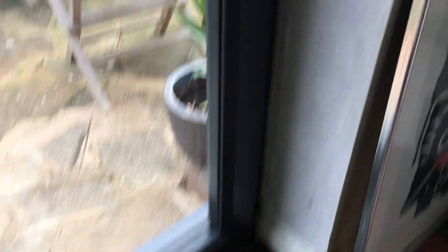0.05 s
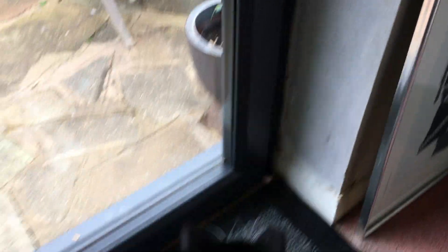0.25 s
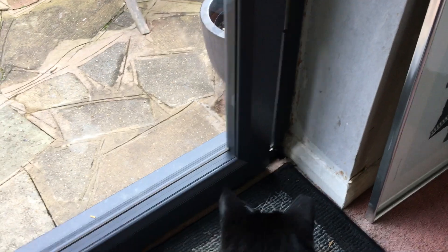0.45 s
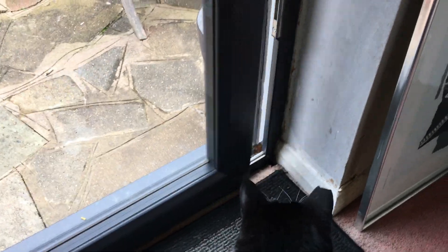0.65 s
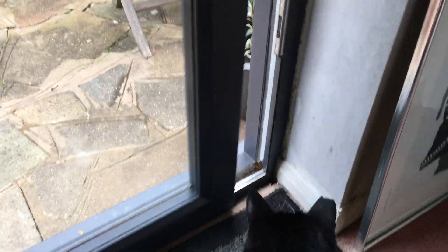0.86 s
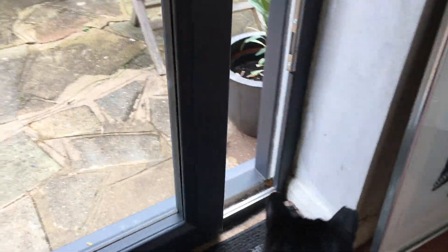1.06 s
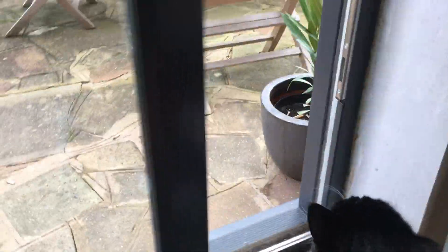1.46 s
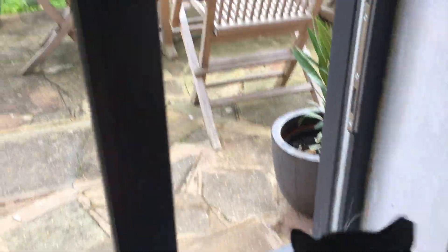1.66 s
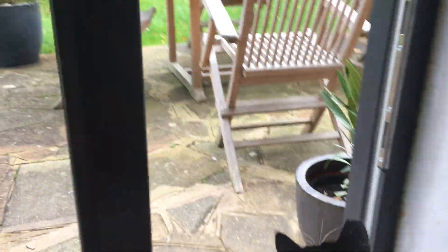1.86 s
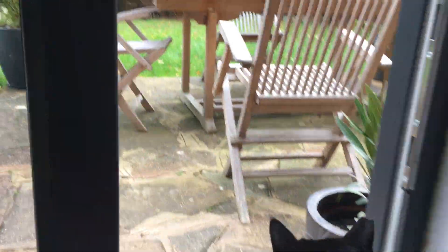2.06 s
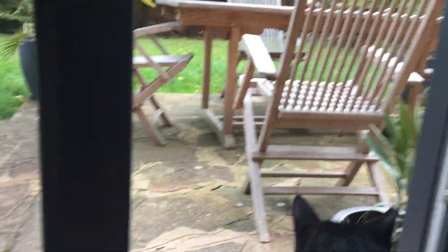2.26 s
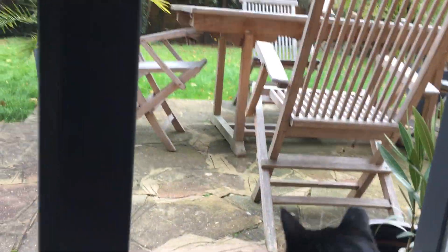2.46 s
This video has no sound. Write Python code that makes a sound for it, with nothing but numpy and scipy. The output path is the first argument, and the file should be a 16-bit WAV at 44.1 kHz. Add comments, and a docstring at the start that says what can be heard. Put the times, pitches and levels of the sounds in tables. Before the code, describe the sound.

Heavy glass door unlatching and rolling open with a low rumble, thumps and clicks.

```python
"""Indoors, close to a heavy glazed patio door as it is slid open. Handle and latch click, and the leaf
comes off its seal with a thump that swings the pane. Rollers rumble over grit in the track, with a few
knocks, while the glass drums and the brush seal hisses. As the door slows to a stop there is one thin
falling chirp, perhaps a small bird in the garden."""
import sys
import numpy as np
from scipy import signal
from scipy.fft import rfft, irfft, next_fast_len
from scipy.io import wavfile
from scipy.ndimage import map_coordinates

SR = 44100
rng = np.random.default_rng(int(sys.argv[2]) if len(sys.argv) > 2 else 0)


def digitize_waveform(pressure):
    """Quantize a signal to 16-bit integers and store it at the path in sys.argv[1].

    Rows of a 2-D input are taken as channels; values are limited to [-1, 1].
    """
    field = np.atleast_2d(pressure).T
    bounded = np.clip(field, -1, 1)
    quanta = np.round(bounded * 32767).astype(np.int16)
    wavfile.write(sys.argv[1], SR, quanta)


N = 114660

# rumble envelope, before its trim (time [s], level [dB])
RUMBLE_LEVEL = [(.1, -71.5), (.3, -64), (.5, -66), (.62, -60), (.8, -54.5), (.88, -47.5), (.97, -47),
                (1.08, -43), (1.25, -45), (1.45, -44.5), (1.65, -43), (1.85, -45.5), (2.0, -52),
                (2.15, -55.5), (2.28, -67.5), (2.45, -77)]
# track EQ with the door nearly shut, then wide open (frequency [Hz], gain [dB])
TRACK_SHUT_EQ = [(100, -24.5), (250, 0), (380, -7.5), (415, -5), (460, 1.5), (490, -1.5), (550, -7.5),
                 (590, 1.5), (640, -1.5), (710, -3.5), (800, -10.5), (1080, -12.5), (1180, -16.5),
                 (1280, -25.5), (2000, -30.5), (3000, -46), (6000, -73), (16000, -81)]
TRACK_OPEN_EQ = [(100, -23.5), (250, 3.5), (340, 8.5), (420, -1), (490, -2.5), (570, 3.5), (690, 4.5),
                 (800, -1), (950, -6), (1150, -5.5), (1400, -20), (2100, -20.5), (3000, -34), (6000, -44),
                 (16000, -99)]
def rollers(trim_db=-2, crossfade_s=(.96, 1.35)):
    """Grit under the rollers rumbles in the track, whose colour shifts as the door travels."""
    blend = np.interp(clock(), crossfade_s, [0, np.pi / 2])
    shut = unit(coloured(grit(), TRACK_SHUT_EQ))
    wide = unit(coloured(grit(), TRACK_OPEN_EQ))
    return amp(curve(RUMBLE_LEVEL) + trim_db) * (np.cos(blend) * shut + np.sin(blend) * wide)


def grit(grains_per_s=520, spread_db=2.5):
    """Tiny random impacts under the rollers, over smooth rolling noise."""
    sizes = amp(spread_db * np.minimum(rng.exponential(size=N), 4)) * np.sign(noise())
    hits = rng.random(N) < grains_per_s / SR
    return unit(unit(sizes * hits) + .5 * noise())


# body resonances of the leaf (frequency [Hz], bandwidth [Hz], gain [dB])
LEAF_MODES = [(76, 3.4, -16), (92.6, 15, -1), (137.1, 11.7, 6.5), (177.4, 23.5, 2.5), (212.7, 9.2, 6),
              (244, 38, -3), (285, 5.8, 0), (347, 15.4, -3)]
# drumming envelope (time [s], level [dB])
DRUM_LEVEL = [(.15, -72), (.3, -52), (.53, -58.5), (.66, -51.5), (.8, -54), (.9, -44), (1.05, -47),
              (1.2, -48), (1.7, -49), (2.03, -48.5), (2.22, -56), (2.38, -64.5), (2.6, -71)]
def leaf_drumming():
    """Rolling shakes the glazed leaf, which drums at its low resonances."""
    def resonances(f):
        return sum(amp(db) * 1j * f * width / (hz * hz - f * f + 1j * f * width)
                   for hz, width, db in LEAF_MODES)
    dark_eq = [(20, -24), (50, 3.5), (380, -5), (700, -9.0), (2000, -36.5)]
    body = filtered(grit(), resonances)
    return amp(curve(DRUM_LEVEL)) * unit(coloured(body, dark_eq))


# jolts to the pane (time [s], level [dB])
JOLTS = [(0.223, -43), (0.35, -39.5), (0.3932, -46.5), (.4964, -55.5), (.955, -45.5), (1.303, -42),
         (2.21, -48), (2.449, -64)]
# the pane's low modes (frequency [Hz], gain [dB], t60 [s])
PANE_MODES = [(48.6, -1.5, .62), (74.3, -6, 0.35), (134, -9, 0.5)]
def pane_thumps(attack_s=.0086):
    """Each jolt sets the whole pane swinging: a soft, deep thump."""
    out = np.zeros(N)
    for start, db in JOLTS:
        age = np.maximum(clock() - start, 0)
        swing = sum(amp(gain) * fade(start, t60) * np.sin(2 * np.pi * hz * age)
                    for hz, gain, t60 in PANE_MODES)
        out += amp(db) * (1 - np.exp(-age / attack_s)) * swing
    return out


# the leaf hitting its frame and bumps in the track (time [s], level [dB], high cut [Hz])
KNOCK_HITS = [(.2165, -53, 3000), (.3275, -52, 2800), (.3472, -43.5, 2800), (.742, -48.5, 800),
              (.868, -47, 4000), (.881, -47, 2800), (1.0235, -38, 1900), (1.055, -46, 2000),
              (1.1503, -42.5, 3400), (1.215, -48, 2400), (1.3905, -41, 1600), (1.395, -41, 1300),
              (1.435, -46, 1000), (1.62, -48, 2500), (1.666, -48, 2800), (1.776, -37.5, 3000),
              (1.7795, -41, 2000), (1.975, -50, 3000)]
# boxy knock EQ (frequency [Hz], gain [dB])
KNOCK_EQ = [(60, -4), (150, 12), (400, 6.5), (650, 8.5), (1100, 6), (1400, -2.5), (1800, -3), (2700, -10.5),
            (3200, -6), (4000, -7.5), (8000, -9)]
def knocks(t60_s=.04, snap_db=18):
    """Quickly damped blows on track and frame; a harder contact is brighter."""
    out = np.zeros(N)
    for start, db, cut_hz in KNOCK_HITS:
        blow = noise() * fade(start, t60_s) + amp(snap_db) * snap(start)
        out += amp(db) * coloured(blow, KNOCK_EQ, lambda f: -10 * np.log10(1 + (f / cut_hz) ** 6))
    return out


# partials of the metal frame (frequency [Hz], gain [dB], t60 [s])
FRAME_MODES = [(1674, 0, .065), (3311, -8, .06), (3700, -10, .055), (4495, -18, .07), (6228, -14, .1),
               (6500, -16, .08)]
def frame_ring(start_s=1.7765, gain_db=-46):
    """The hardest knock leaves the metal frame ringing for a moment."""
    age = clock() - start_s
    partials = (amp(db) * fade(start_s, t60) * np.sin(2 * np.pi * hz * age + .5 * wobble(300))
                for hz, db, t60 in FRAME_MODES)
    return amp(gain_db) * sum(partials)


# handle, latch and frame clicks (time [s], level [dB], centre [Hz], half-width [octaves])
CLICK_HITS = [(.068, -55, 6000, 0.6), (.076, -61, 6100, 0.93), (.085, -57, 4000, 0.6),
              (.2045, -60, 5000, 1.5), (0.2157, -49, 5600, 0.7), (.304, -61, 11000, .7),
              (0.3125, -54.5, 8000, 0.62), (.3178, -62, 6000, 1.2), (.3225, -61, 9000, 1),
              (0.3491, -52, 12200, 0.54), (.356, -61, 8500, .8), (.3632, -40, 11000, 1),
              (1.4289, -48, 6300, 0.7), (1.7565, -55, 8000, 0.85), (1.776, -46.5, 7000, 1.5),
              (1.785, -54, 4870, 0.6), (1.7915, -54, 5500, .6), (1.881, -60, 12000, .5),
              (1.934, -54.5, 5000, 1.2)]
# bright metal EQ (frequency [Hz], gain [dB])
METAL_EQ = [(1000, -6), (3500, 1), (4900, -4), (5600, 0), (7000, 1), (7600, -4), (8400, 5), (9400, 2),
            (10400, -5), (13300, -2), (14800, 1), (15800, -7), (17000, -30)]
def metal_clicks(t60_s=.007, snap_db=13, rattle_db=-16, rattle_t60_s=.065):
    """Metal parts meet with a sharp crack and a faint rattling tail."""
    out = np.zeros(N)
    for start, db, hz, octaves in CLICK_HITS:
        decay = fade(start, t60_s) + amp(rattle_db) * fade(start, rattle_t60_s)
        burst = amp(snap_db) * snap(start) + noise() * decay
        band_db = lambda f: -10 * np.log10(1 + (np.log2((f + 1) / hz) / octaves) ** 4)
        out += amp(db) * coloured(burst, METAL_EQ, band_db)
    return out


# short rubs of bolt and seal (time [s], level [dB], hold [s])
SCRAPE_CUES = [(0.073, -58, 0.011), (0.203, -58, 0.044), (0.305, -54.5, 0.03), (0.356, -49, 0.0098),
               (1.361, -52.5, 0.028), (1.766, -52.5, 0.028), (1.932, -53.5, 0.014)]
# dull scrape EQ (frequency [Hz], gain [dB])
SCRAPE_EQ = [(80, 9), (220, 10), (370, 8.5), (450, 3), (680, 9), (1200, 0), (2200, 0.5), (3000, -5),
             (4200, -7), (8000, -35), (16000, -27)]
def scrapes(attack_s=.0013, release_t60_s=.08, grain_db=2):
    """Grainy friction of bolt and seal that bites, holds and dies away."""
    t, envelope = clock(), np.zeros(N)
    for start, db, hold in SCRAPE_CUES:
        attack = np.clip((t - start) / attack_s, 0, 1)
        envelope += amp(db) * attack * ((t < start + hold) + fade(start + hold, release_t60_s))
    friction = unit(noise() * amp(grain_db * wobble(270)))
    return coloured(envelope * friction, SCRAPE_EQ)


# envelope of the track's tone (time [s], level [dB])
SING_LEVEL = [(.85, -70), (.905, -49), (.935, -55), (.955, -43), (.985, -46), (1.05, -56), (1.12, -53),
              (1.25, -70)]
def track_sing(pitch_hz=556, waver=.02, flutter_db=2.5):
    """A roller sets the track singing, briefly and unsteadily, as the door gathers speed."""
    hz = pitch_hz * (1 + waver * wobble(110))
    tone = np.sqrt(2) * np.sin(2 * np.pi * np.cumsum(hz) / SR)
    return amp(curve(SING_LEVEL) + flutter_db * wobble(59.1)) * gate(SING_LEVEL) * tone


# hiss envelope (time [s], level [dB])
BRUSH_LEVEL = [(0, -69), (.18, -68), (.28, -74), (.45, -73), (.7, -70.5), (1.0, -64.5), (1.4, -61.5),
               (1.8, -62.5), (2.1, -63.5), (2.3, -67), (2.42, -71.5), (2.6, -93)]
# bristle EQ (frequency [Hz], gain [dB])
BRISTLE_EQ = [(300, -13.5), (2000, 10.5), (2900, 2), (3200, 4.5), (4300, 2.5), (4900, -3), (5600, 2.5),
              (7500, -1), (9700, 0), (10400, -5), (11500, -1.5), (15500, -14.5)]
def brush_seal():
    """A light rustle at the handle swells into the hiss of bristles rubbing along the frame."""
    return amp(curve(BRUSH_LEVEL)) * unit(coloured(noise(), BRISTLE_EQ))


# glides of the lower and upper whistle (time [s], pitch [Hz], level [dB])
LOW_WHISTLE = [(2.206, 9800, -74), (2.218, 9080, -61), (2.24, 8880, -55.5), (2.248, 8850, -72),
               (2.27, 8850, -56), (2.28, 8200, -63), (2.297, 7650, -68), (2.314, 6900, -62),
               (2.336, 6450, -65), (2.351, 4300, -68), (2.365, 3830, -82)]
HIGH_WHISTLE = [(2.272, 10020, -70), (2.293, 9800, -63), (2.312, 9000, -63), (2.335, 8000, -63.5),
                (2.355, 6100, -76)]
def chirp(fray_s=(2.265, 2.355), waver=.008, flutter_db=3.2, octave_db=-6.5, echo_db=-6.5):
    """Two thin whistles slide down and fray into a rasp, with a weak octave and an echo."""
    out = np.zeros(N)
    rasp = np.interp(clock(), fray_s, [0, .06])  # fast jitter, as a share of the pitch
    for glide in (LOW_WHISTLE, HIGH_WHISTLE):
        hz = curve(glide) * (1 + waver * wobble(400) + rasp * wobble(2000))
        phase = 2 * np.pi * np.cumsum(hz) / SR
        envelope = amp(curve(glide, column=2) + flutter_db * wobble(300)) * gate(glide)
        out += envelope * (np.sin(phase) + amp(octave_db) * np.sin(2 * phase))
    return out + amp(echo_db) * echo(out, t60=.15)


# ambience EQ (frequency [Hz], gain [dB])
AMBIENCE_EQ = [(20, -28), (35, -15), (52, 9.5), (80, 0.5), (140, -6), (270, -11.5), (450, -27), (1000, -20),
               (1900, -27), (3000, -31), (4900, -34.5), (6000, -31), (9500, -38), (10500, -42),
               (16000, -38.5)]
def ambience(level_db=-57):
    """A steady, bass-heavy bed of room and garden air."""
    return amp(level_db) * unit(coloured(noise(), AMBIENCE_EQ))


def amp(db):
    """Decibels to gain."""
    return 10 ** (np.asarray(db) / 20)


def unit(x):
    """Scale to rms 1."""
    return x / np.sqrt(np.mean(x ** 2) + 1e-20)


def clock():
    """Time of every sample."""
    return np.arange(N) / SR


def curve(rows, column=1):
    """One column of a table, joined by straight lines in time."""
    rows = np.array(rows)
    return np.interp(clock(), rows[:, 0], rows[:, column])


def gate(rows):
    """Open between a table's first and last times."""
    return (clock() > rows[0][0]) & (clock() < rows[-1][0])


def noise():
    """Fresh white noise."""
    return rng.standard_normal(N)


def snap(start):
    """A single impulse at a start time."""
    return 1.0 * (np.arange(N) == round(start * SR))


def fade(start, t60):
    """Exponential decay from a start time."""
    age = clock() - start
    return (age >= 0) * np.exp(-np.log(1000) * np.maximum(age, 0) / t60)


def wobble(rate):
    """A smooth random curve, rate knots a second."""
    knots = rng.standard_normal(int(N * rate / SR) + 4)
    return map_coordinates(knots, [np.arange(N) * rate / SR])


def filtered(x, response):
    """Multiply the spectrum by a function of frequency."""
    size = 2 * next_fast_len(N)
    return irfft(rfft(x, size) * response(np.fft.rfftfreq(size, 1 / SR)), size)[:N]


def coloured(x, eq, shape_db=lambda hz: 0):
    """Unit-power EQ through (Hz, dB) points, plus an optional extra shape."""
    eq_hz, eq_db = np.transpose(eq)
    def response(hz):
        gain = unit(amp(np.interp(np.log(hz + 1), np.log(eq_hz), eq_db) + shape_db(hz)))
        # minimum phase, so nothing rings ahead of a hit
        cepstrum = irfft(np.log(np.maximum(gain, 1e-5)))
        half = len(cepstrum) // 2
        cepstrum[1:half] *= 2
        cepstrum[half + 1:] = 0
        return np.exp(rfft(cepstrum))
    return filtered(x, response)


def echo(x, t60):
    """Reverb from a diffuse tail of unit energy."""
    tail = (noise() * fade(.00464, t60))[:SR // 2]
    return signal.fftconvolve(x, tail / np.linalg.norm(tail))[:N]


def scene(room_db=-11.5, room_t60_s=.15, high_cut_hz=15850):
    """Mono mix: the door, with a small room on its contacts, over hiss and chirp."""
    contacts = knocks() + frame_ring() + metal_clicks() + scrapes()
    door = rollers() + track_sing() + leaf_drumming() + pane_thumps() + contacts
    room = amp(room_db) * echo(contacts, room_t60_s)
    backdrop = filtered(brush_seal() + ambience() + chirp(), lambda hz: hz < high_cut_hz)
    return (door + room + backdrop)[None]


def record(dry, high_cut_hz=16500):
    """A brick-wall high cut on the whole mix."""
    return filtered(dry[0], lambda hz: hz < high_cut_hz)[None]


dry = scene()
out = record(dry)
digitize_waveform(out)
```